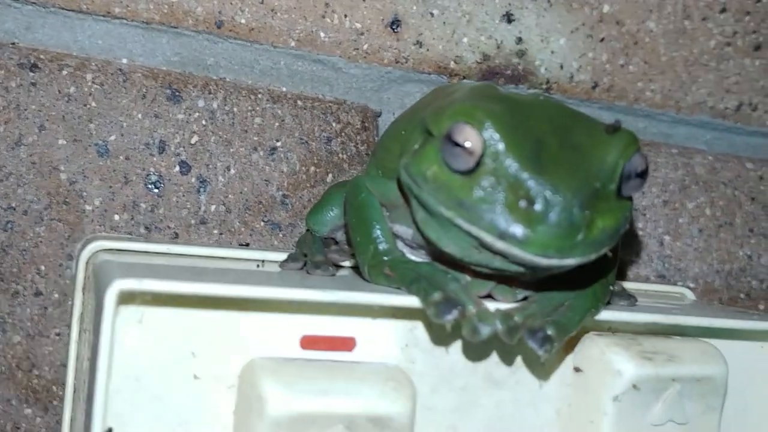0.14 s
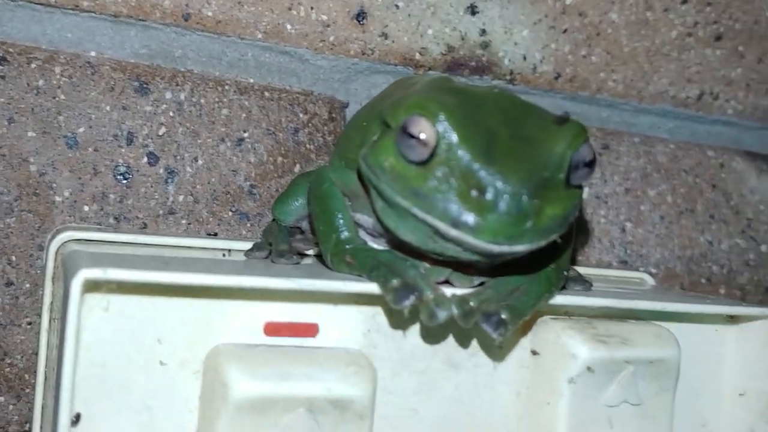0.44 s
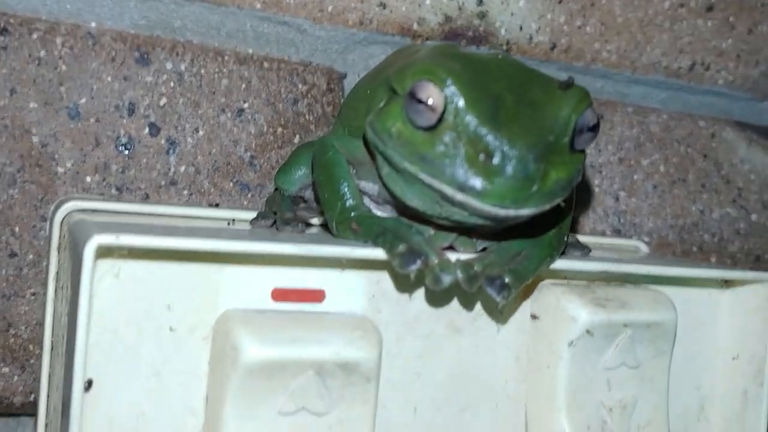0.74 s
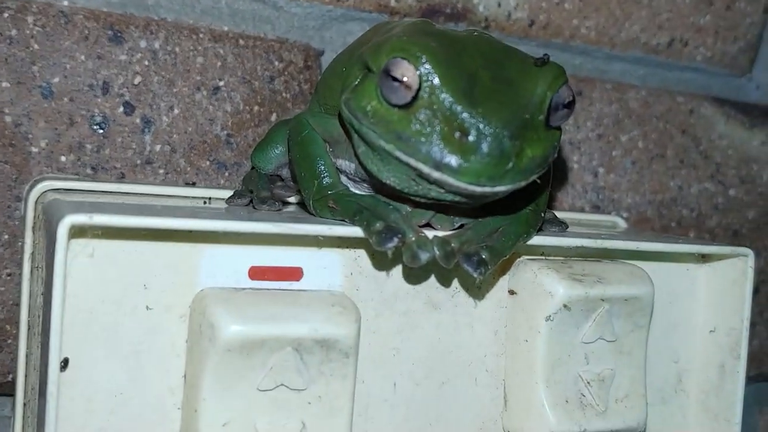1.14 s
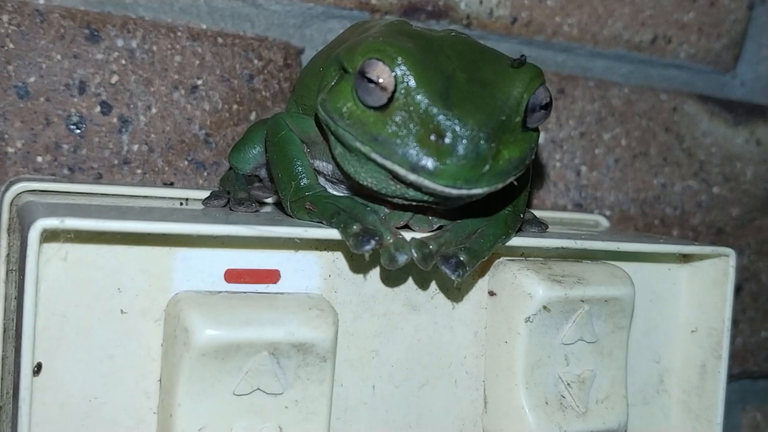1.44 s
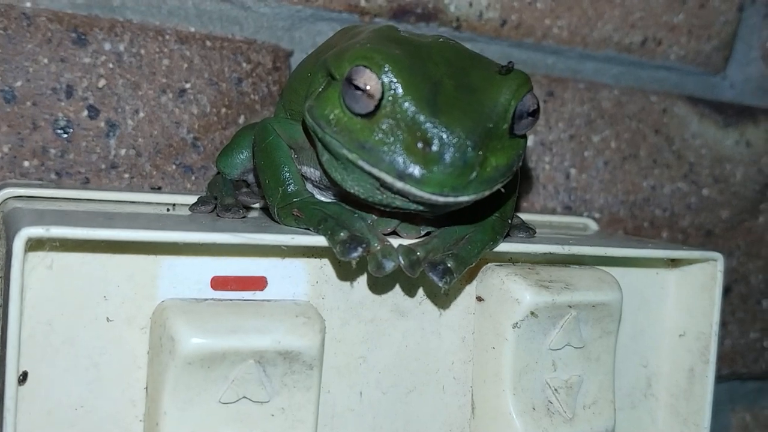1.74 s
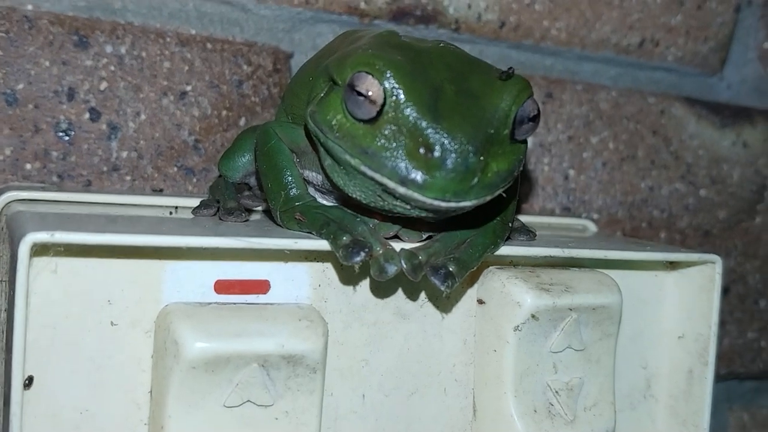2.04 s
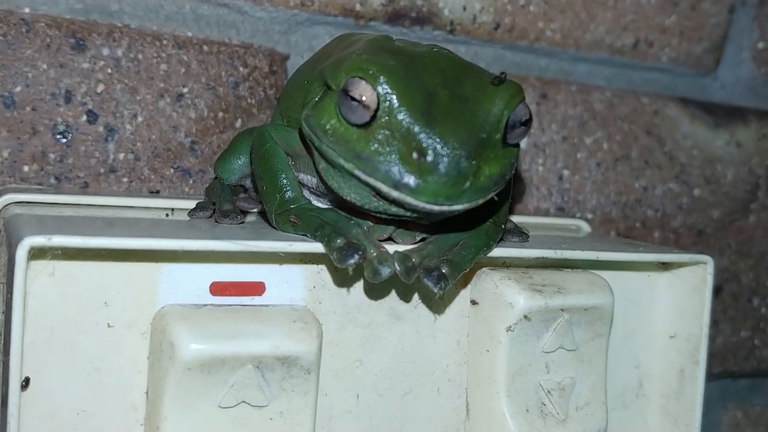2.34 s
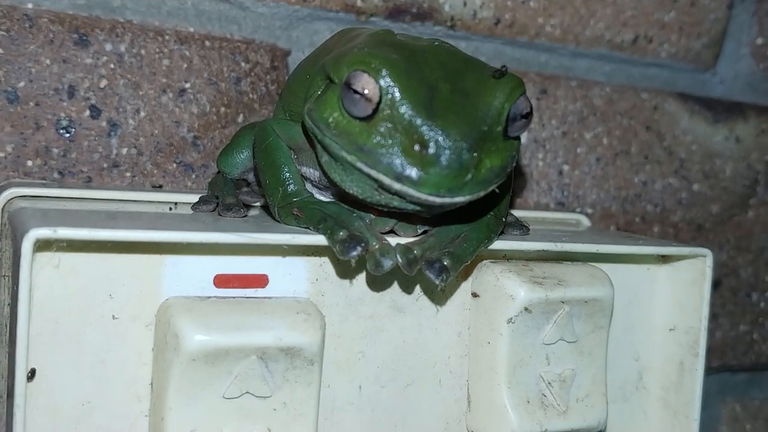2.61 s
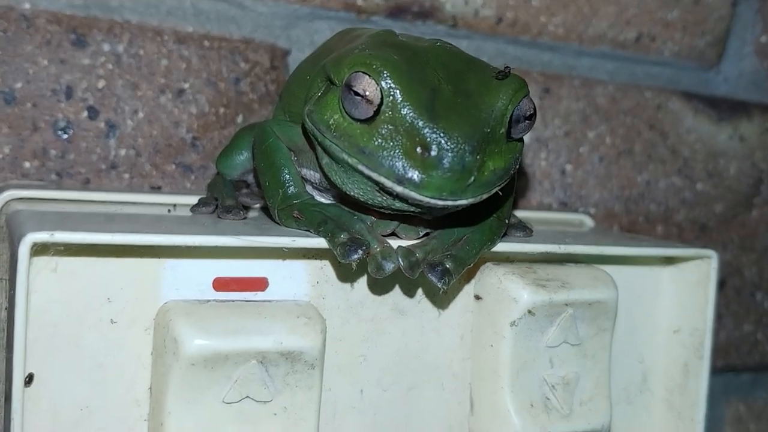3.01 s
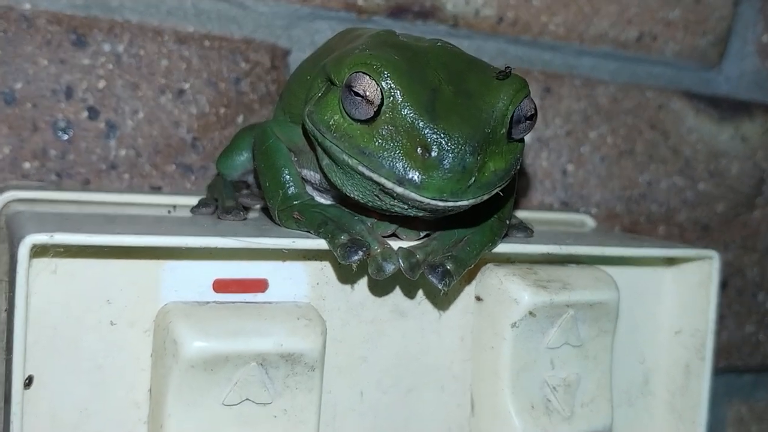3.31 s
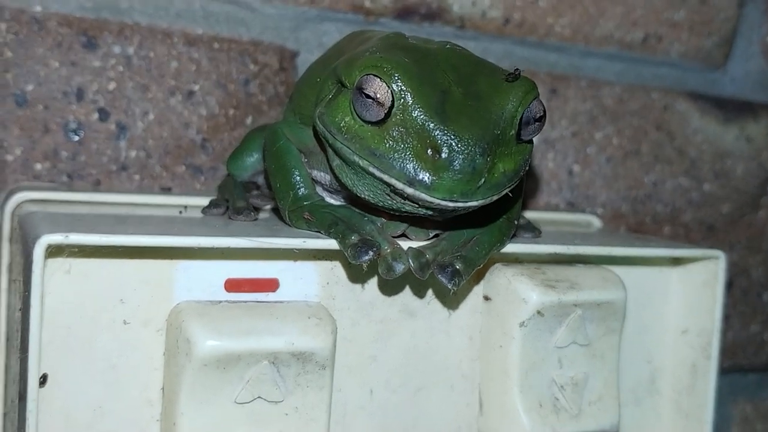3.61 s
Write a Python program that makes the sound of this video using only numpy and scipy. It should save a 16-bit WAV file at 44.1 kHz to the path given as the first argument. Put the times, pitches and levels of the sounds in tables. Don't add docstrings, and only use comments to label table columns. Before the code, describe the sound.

Night insects outdoors: cricket chirps repeat about every 0.4 seconds over a steady low buzzing drone, shimmering high trills and a faint distant chorus. A dull handling knock with a tiny rattle comes at about 0.05 seconds. Soft distant traffic rumble and hiss lie beneath. Around 2.9 seconds the drone stops and the background dips; short drone bursts return from 3.1, fuller by 3.6.

```python
import sys
import numpy as np
from scipy import signal
from scipy.fft import rfft, irfft
from scipy.io import wavfile
from scipy.ndimage import uniform_filter1d

SR = 44100
rng = np.random.default_rng(int(sys.argv[2]) if len(sys.argv) > 2 else 0)


def inscribe(sig):
    pcm = np.round(np.clip(np.atleast_2d(sig).T, -1, 1) * 32767)
    wavfile.write(sys.argv[1], SR, pcm.astype(np.int16))


def how_loud(loudness_db):
    steps = np.asarray(loudness_db, float) / 20
    return 10 ** steps


N = 165816


def evened(x):
    return x / np.sqrt(np.mean(x ** 2) + 1e-20)


def read(points, hz):
    f, value = np.transpose(points)
    return np.interp(np.log(hz + 1), np.log(f + 1), value)


def drift(size, count):
    smooth = uniform_filter1d(rng.standard_normal(count + 3000), size)
    return evened(uniform_filter1d(smooth, size))[:count]


def span(start, length, edge):
    t = np.arange(N) / SR
    return np.clip(np.minimum(t - start, start + length - t) / edge + .5, 0, 1)


def wing(hz, per_s, sharp, wander_hz, rough, uneven_db, sag, start=0, end=4):
    first, last = np.clip([round((start - .05) * SR), round((end + .05) * SR)], 0, N)
    n = last - first
    stroke_rate = per_s * (1 + 0.01517 * drift(size=3000, count=n))
    stroke = (np.cumsum(stroke_rate) / SR + rng.random()) % 1
    pitch = hz + wander_hz * drift(size=900, count=n)
    phase = 2 * np.pi * (np.cumsum(pitch) / SR)
    phase = phase + rough * drift(size=60, count=n) + sag * np.sin(2 * np.pi * stroke)
    pulse = np.sin(np.pi * stroke ** 0.66) ** (2 * sharp)
    out = np.zeros(N)
    out[first:last] = evened(np.cos(phase) * pulse * how_loud(uneven_db * drift(size=500, count=n)))
    return out


def yard(x):
    t60_s, echo_db, port_gap_s = .12, -5, .0004
    t = np.arange(SR // 6) / SR
    taps = rng.choice([-1., 1.], (2, len(t))) * (rng.random((2, len(t))) < .05) * how_loud(-60 * t / t60_s)
    taps *= how_loud(echo_db) / np.linalg.norm(taps, axis=1, keepdims=True)
    arrival = (rng.random(2) * port_gap_s * SR).astype(int)
    taps[[0, 1], arrival] = 1
    heard = np.flatnonzero(x)
    first, last = heard[0], heard[-1]
    out = np.zeros((2, N + len(t)))
    out[:, first:last + len(t)] = signal.oaconvolve(x[None, first:last + 1], taps, axes=1)
    return out[:, :N]


def drone():
    # start t/s, end t/s, wing f/Hz, stroke rate f/Hz
    phrases = [(-1, 2.87, 1612, 97), (-1, 2.9, 1636, 99), (-1, 2.72, 1660, 100), (-1, 2.91, 1486, 68),
               (-1, 2.9, 1929, 80), (-1, 2.9, 1259, 88), (3.08, 3.27, 1636, 99), (3.1, 3.43, 1700, 90),
               (3.23, 3.33, 1484, 68), (3.3, 3.41, 1636, 99), (3.435, 3.54, 1668, 100), (3.56, 4, 1636, 99),
               (3.56, 4, 1660, 100), (3.58, 4, 1612, 97), (3.56, 4, 1259, 88)]
    phrase_levels = [-55, -54.5, -56.5, -69, -69, -77, -51.5, -58.5, -57.5, -50.5, -43, -62, -52, -56, -73]
    out = np.zeros((2, N))
    for (start, end, hz, per_s), db in zip(phrases, phrase_levels):
        tone = wing(hz, per_s, sharp=0.7, wander_hz=8.08, rough=0.078, uneven_db=0.4, sag=0.11,
                    start=start, end=end)
        out += yard(how_loud(db) * span(start, end - start, edge=.03) * tone)
    return out


def cricket():
    # start t/s, length t/s, level/dB
    chirps = [(-.06, 0.24, -53), (0.23, 0.16, -44.5), (0.641, 0.13, -44.5), (1.007, 0.15, -43.5),
              (1.304, 0.11, -53), (1.432, 0.13, -44.5), (1.602, .11, -48.5), (1.86, 0.16, -45),
              (2.234, 0.2, -45), (2.61, .2, -46), (3.03, 0.2, -45.5), (3.414, 0.19, -45.5),
              (3.608, 0.16, -49.5)]
    # wing f/Hz, stroke rate f/Hz, level/dB
    wings = [(4575, 62, 0), (4445, 62, 0), (4316, 60, -5), (4700, 64, -6)]
    effort = sum(how_loud(db) * span(start, length, edge=0.062) for start, length, db in chirps)
    out = np.zeros((2, N))
    for hz, per_s, db in wings:
        tone = wing(hz, per_s, sharp=1.16, wander_hz=24.73, rough=0.31, uneven_db=2.0, sag=0.14)
        out += yard(effort * how_loud(db - 3.0) * tone)
    return out


def trillers():
    # start t/s, end t/s, wing f/Hz, stroke rate f/Hz
    trills = [(-.9, .5, 8810, 104), (1.6, 2.62, 8810, 104), (-1, .21, 9280, 112), (1.0, 2.2, 9270, 109),
              (3.0, 3.9, 9270, 110), (-.3, .76, 9680, 120), (1.0, 1.88, 9700, 119), (2.2, 2.73, 9700, 118),
              (2.95, 4.0, 9720, 120), (-1, .95, 8650, 104), (.2, 1.6, 8650, 98), (1.5, 2.95, 8560, 104),
              (2.4, 4.0, 8640, 100), (1.25, 2.0, 8950, 110), (3.3, 4.0, 9650, 120), (-3, 3.0, 8420, 104)]
    top_levels = [-47, -47.5, -50.5, -46.5, -49.5, -66, -58.5, -64, -51, -55, -57.5, -57, -51.5, -54.5,
                  -63.5, -59]
    swell_db, stop_s = -11, .025
    t = np.arange(N) / SR
    out = np.zeros((2, N))
    for (start, end, hz, per_s), db in zip(trills, top_levels):
        grown = np.clip((t - start) / (end - start), 0, 1)
        effort = how_loud(db + swell_db * (1 - grown) ** 2) * np.minimum(grown * 4, 1)
        effort = effort * span(start, end - start, stop_s)
        tone = wing(hz, per_s, sharp=0.73, wander_hz=21.57, rough=0.59, uneven_db=-0.47, sag=0.42,
                    start=start, end=end)
        out += yard(effort * tone)
    return out


def ticker():
    # start t/s, length t/s, level/dB, wing f/Hz
    far_chirps = [(.27, .2, -63, 7390), (.8, .19, -64, 7390), (1.552, .19, -61, 7390),
                  (2.248, .2, -60, 7390), (3.08, .2, -62, 7390), (1.22, .13, -67, 7620),
                  (1.57, .17, -66, 7780), (2.1, .2, -67, 7740), (2.56, .14, -67, 7760),
                  (3.58, .17, -66, 7760)]
    out = np.zeros(N)
    for start, length, db, hz in far_chirps:
        tone = wing(hz, per_s=58, sharp=2.5, wander_hz=15, rough=.3, uneven_db=1.5, sag=.3,
                    start=start, end=start + length)
        out += how_loud(db) * span(start, length, edge=0.035) * tone
    return yard(out)


def tap():
    # t/s, left level/dB, right level/dB
    knocks = [
        (.0450, -18, -14),
        (.072, -44, -37),
        (.083, -44, -34),
        (.097, -45, -38),
    ]
    # f/Hz, left level/dB, right level/dB, T60 t/s
    modes = [(120, -23, -25, 0.0081), (207.4, -4.5, -6.5, 0.018), (316, -3, -6.5, .018),
             (860, -1.5, -7.5, 0.014), (1340, -9.5, -8, 0.0086), (2900, -20, -14, 0.0062)]
    contact_s, right_late_s = .0012, .0005
    rustle_db, rustle_t60_s = -48, .2
    out = np.zeros((2, N))
    for start, left_db, right_db in knocks:
        for port, (late, db) in enumerate([(0, left_db), (right_late_s, right_db)]):
            t = np.maximum(np.arange(SR // 4) / SR - start - late, 0)
            ring = sum(how_loud(levels[port] - 60 * t / t60) * np.sin(2 * np.pi * hz * t)
                       for hz, *levels, t60 in modes)
            out[port, :SR // 4] += how_loud(db) * ring * (1 - np.exp(-t / contact_s))
    t = np.arange(N) / SR - knocks[0][0]
    band = signal.butter(3, [300, 1300], 'band', fs=SR)
    grip = evened(signal.lfilter(*band, rng.standard_normal((2, N))))
    return out + grip * how_loud(rustle_db - 60 * abs(t) / rustle_t60_s) * (t > 0)


def hiss(shape, patch_db, swell_db, top_ratio):
    # f/Hz, coherence/1
    coherence = [(30, 1), (100, 0.77), (260, 0.7), (500, 0.31), (1300, 0), (2300, 0.1), (3200, 0.08)]
    right_phase = -1.12
    frames, hz = N // 256 + 5, np.fft.rfftfreq(1024, 1 / SR)
    a, b, c, d, patches = rng.standard_normal((frames, 513, 5)).T
    patches = evened(uniform_filter1d(uniform_filter1d(patches, 8, 0), 10, 1))
    swell = evened(uniform_filter1d(rng.standard_normal(frames), 8))
    same = np.clip(read(coherence, hz), 0, 1)[:, None]
    turn = np.exp(1j * right_phase * (hz < 300))[:, None]
    left = a + 1j * b
    right = same * turn * left + np.sqrt(1 - same ** 2) * (c + 1j * d)
    z = np.array([left, right])
    inside = (hz > .9 * shape[0][0]) & (hz < top_ratio * shape[-1][0])
    z *= how_loud(read(shape, hz)[:, None] + patch_db * patches + swell_db * swell) * inside[:, None]
    return evened(signal.istft(z, nperseg=1024, noverlap=768)[1][:, :N])


def far_chorus():
    # f/Hz, spectral level/dB per Hz
    low_band = [(3500, -57), (3900, -18), (4200, -0.5), (4450, 1.5), (4750, -5.5), (5100, -14),
                (5600, -27.5)]
    # f/Hz, spectral level/dB per Hz
    high_band = [(6800, -22.5), (7500, -14.5), (8050, -14.5), (8350, -9), (8700, 7), (9300, -2.5),
                 (9800, -14.5), (10300, -35)]
    low = how_loud(-50) * hiss(low_band, patch_db=0.5, swell_db=1.0, top_ratio=0.96)
    high = how_loud(-55.5) * hiss(high_band, patch_db=0.5, swell_db=0.93, top_ratio=1.2)
    return low + high


def night_air():
    # f/Hz, spectral level/dB per Hz
    air_spectrum = [(22, -34.5), (45, -2.5), (70, 5), (130, -5.5), (260, -13), (700, -26.5), (2300, -30.5),
                    (3700, -33)]
    # t/s, level/dB
    traffic = [
        (0, 1.5),
        (1.2, 2),
        (2.099, 2.5),
        (2.6, 1.5),
        (3.76, 2.5),
    ]
    traffic_db = np.interp(np.arange(N) / SR, *np.transpose(traffic))
    return how_loud(-46 + traffic_db) * hiss(air_spectrum, patch_db=0.5, swell_db=-0.04, top_ratio=10)


def scene():
    # f/Hz, level/dB
    port_low = [(40, -7), (90, -7), (170, -10), (300, -17), (800, -9), (1600, -12), (2500, -7), (4500, -9)]
    # f/Hz, level/dB
    port_high = [(4500, 0), (7200, -1), (8600, 18.5), (10300, 9)]
    mix = night_air() + far_chorus() + drone() + cricket() + trillers() + ticker()
    hz = np.fft.rfftfreq(N, 1 / SR)
    right_db = read(port_low, hz) + read(port_high, hz)
    return irfft(rfft(mix) * how_loud([0 * hz, right_db]), N) + tap()


def masked(x):
    # t/s, level/dB, fall/dB per kHz
    leaks = [(.05, -10, 0), (.3, -3, 30), (.485, -6, 0), (.69, 0, 24), (.835, 0, 34), (1.1, -3, 26),
             (1.22, 0, 30), (1.84, -3, 40), (2.235, -2, 26), (2.77, -10, 14), (2.895, 0, 0)]
    mask_db, mask_from_hz = -11, 5000
    gap_hz = 5700, 7000
    hz, t, z = signal.stft(x, SR, nperseg=2048, noverlap=1024)
    power = abs(z[:, :1024]) ** 2
    band = np.repeat(power.reshape(2, 256, 4, -1).mean(axis=2), 4, axis=1)
    band = uniform_filter1d(band, size=8, axis=1)
    hiss_power = band[:, 100:160].mean(axis=1, keepdims=True)
    above_db = 10 * np.log10(abs(band) / hiss_power + 1e-30) - mask_db
    into_khz = (np.clip(hz[:1024, None], *gap_hz) - gap_hz[0]) / 1000
    leak = sum(how_loud(db - fall * into_khz) * (abs(t - s) <= 512 / SR) for s, db, fall in leaks)
    high = (hz[:1024] > mask_from_hz)[:, None]
    z[:, :1024] *= np.where(high, np.clip(above_db + .5, leak, 1), 1)
    return signal.istft(z, SR, nperseg=2048, noverlap=1024)[1][:, :N]


def roll_off(x):
    return signal.sosfilt(signal.butter(12, 10900, fs=SR, output="sos"), x)


def record(dry):
    # f/Hz, level/dB
    capsule = [(3600, 0), (5300, -3), (5700, -11.5), (6200, -15.5), (6600, -14.5), (7000, -8.5),
               (10100, -3), (10900, -31.5)]
    # from t/s, to t/s, level/dB
    gate = [
        (0.504, 0.515, -10.5),
        (2.733, 2.786, -9),
        (2.825, 2.881, -7),
        (2.908, 3.572, -9.5),
        (3.577, 3.9, -1.5),
    ]
    bass_share, bass_hz, gate_edge_s = 0.27, 103, 0.027
    hz = np.fft.rfftfreq(N, 1 / SR)
    z = rfft(dry) * how_loud(read(capsule, hz) - 60 * (hz > 11000))
    bass = irfft(z / (1 + (hz / bass_hz) ** 4), N)
    rest = irfft(z, N) - bass
    gate_db = sum(db * span(start, end - start, gate_edge_s) for start, end, db in gate)
    gated = bass * how_loud(bass_share * gate_db) + rest * how_loud(gate_db)
    return roll_off(masked(gated))


dry = scene()
out = record(dry)
inscribe(out)
```